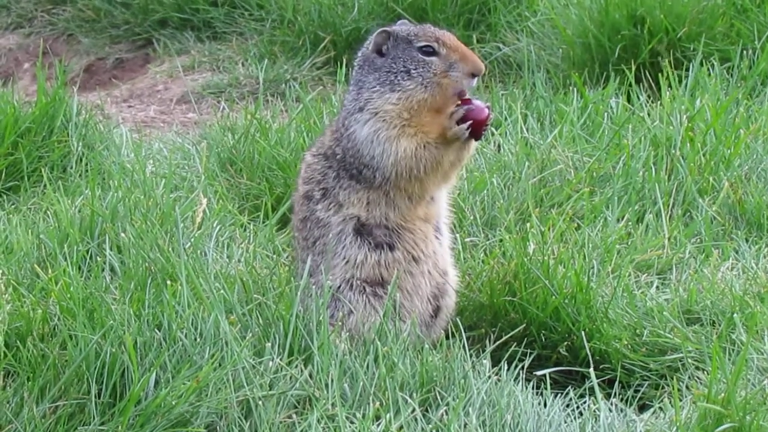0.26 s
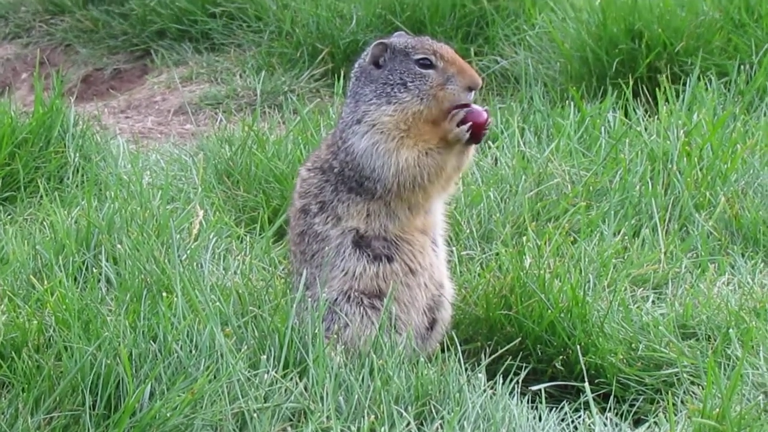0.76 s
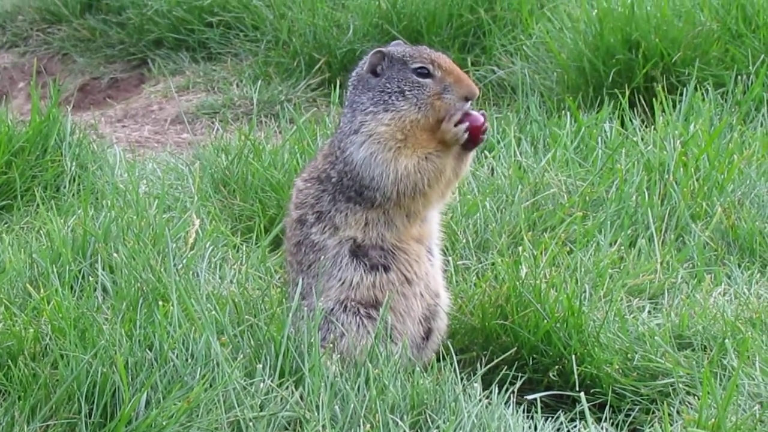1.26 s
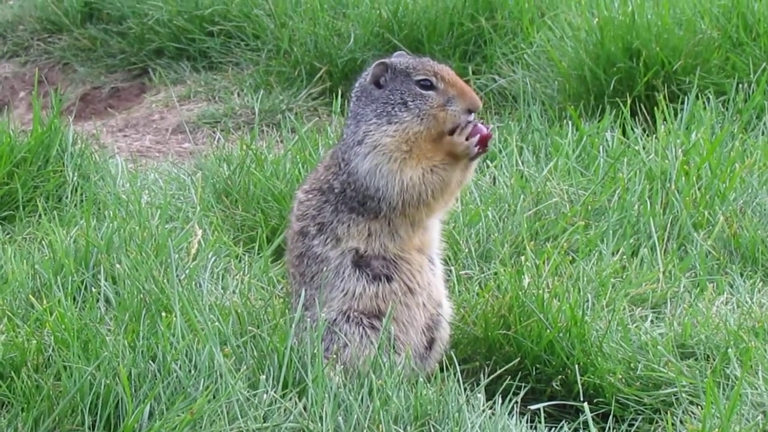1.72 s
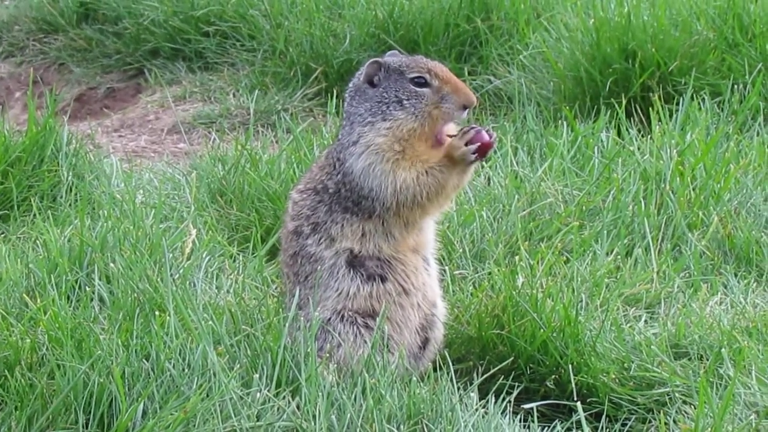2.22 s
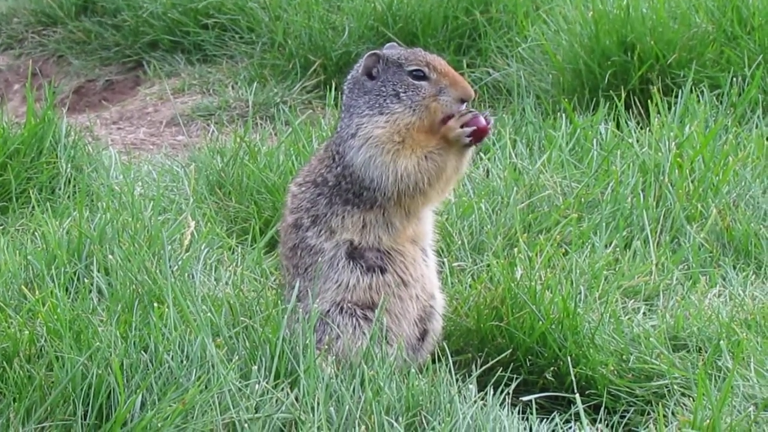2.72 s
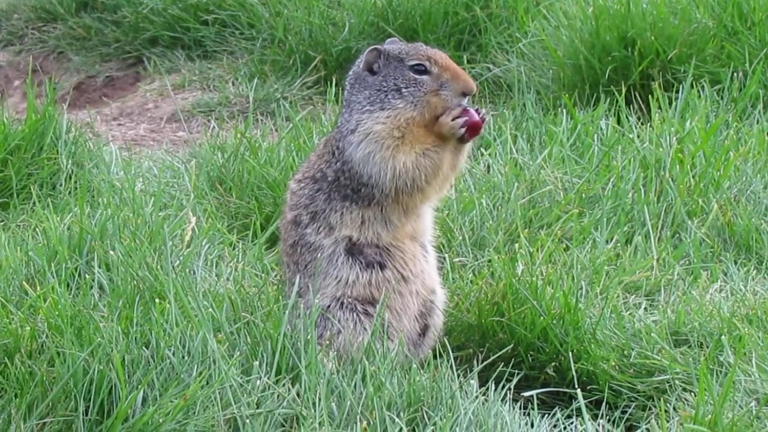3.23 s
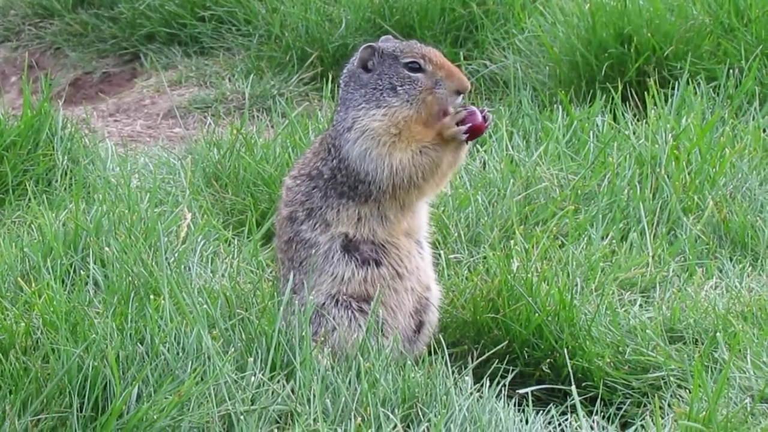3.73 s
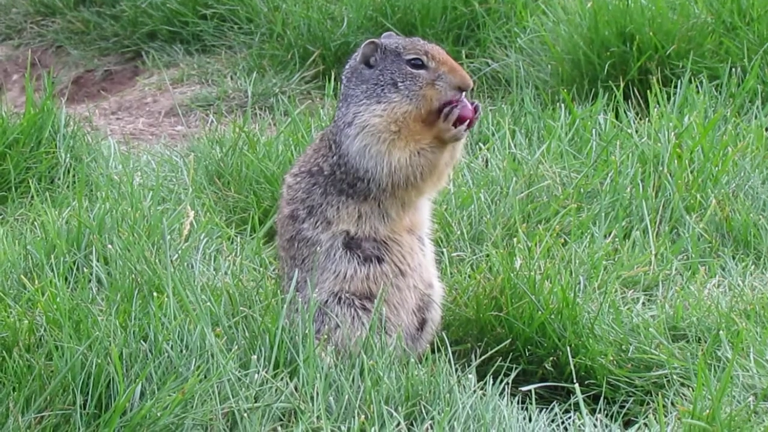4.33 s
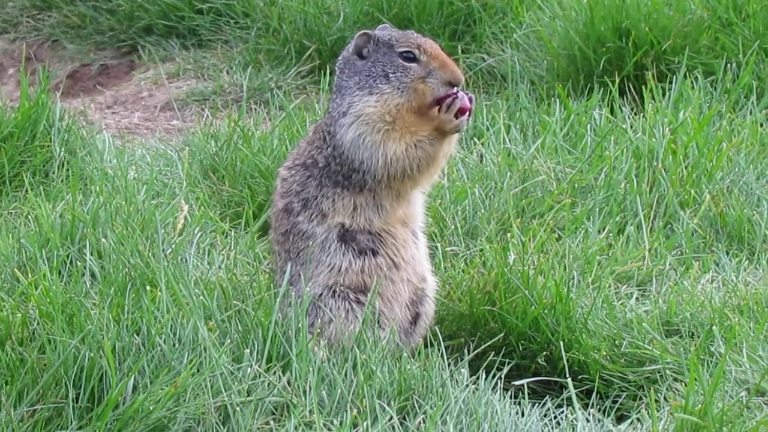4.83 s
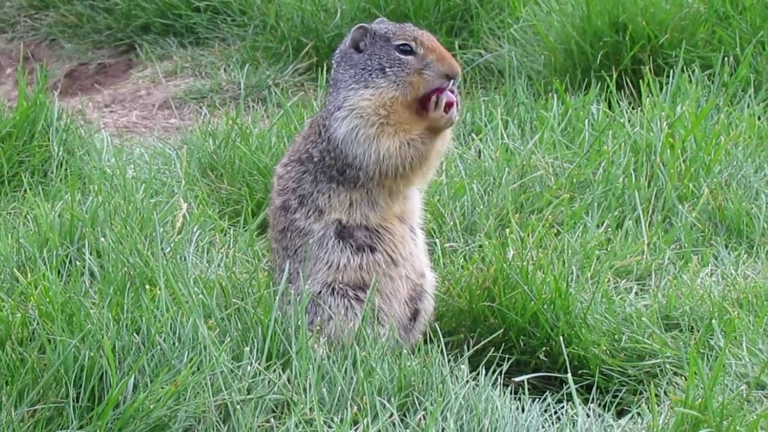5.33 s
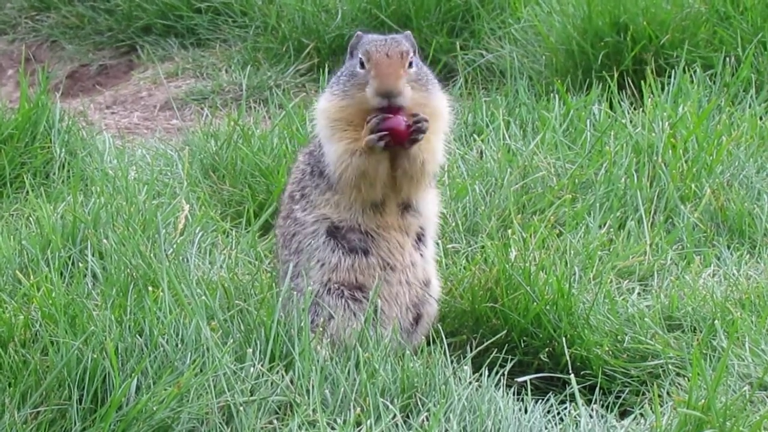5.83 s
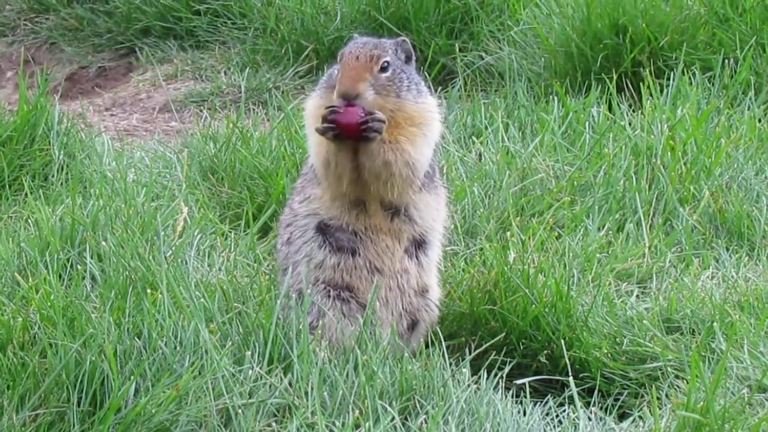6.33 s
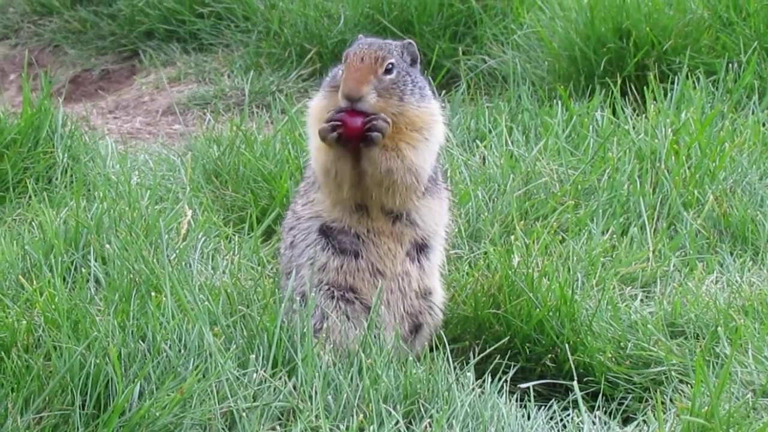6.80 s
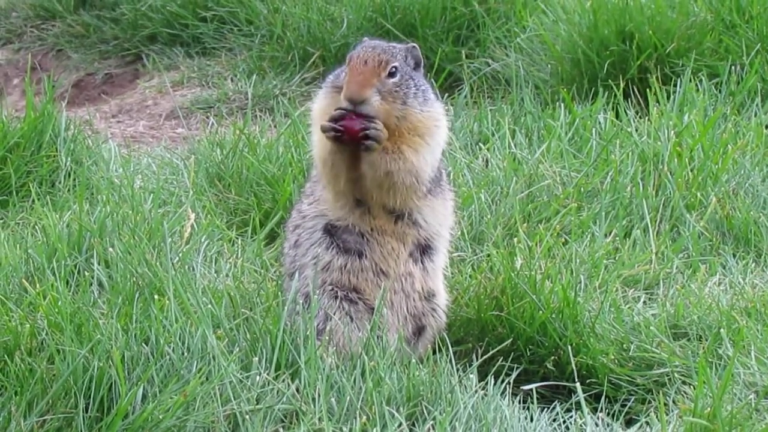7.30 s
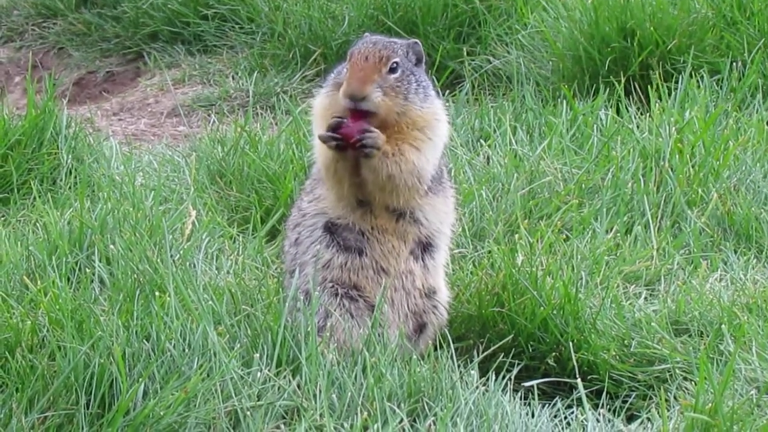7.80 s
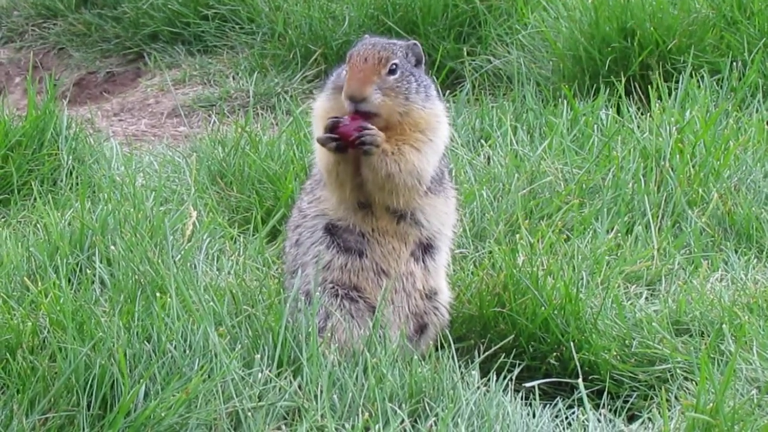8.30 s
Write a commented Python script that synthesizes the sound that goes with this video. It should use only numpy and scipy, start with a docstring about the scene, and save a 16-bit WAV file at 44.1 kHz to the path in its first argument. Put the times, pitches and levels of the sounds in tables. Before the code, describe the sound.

Ground squirrels trade short shrill alarm chirps across an open meadow while one nibbles fruit close by and rising wind buffets and thumps the microphone.

```python
"""Ground squirrels trade shrill alarm chirps across an open meadow: gliding near-pure tones with overtones and rasp.
The edge of the meadow answers each call with a copy and a scattered tail.
One animal nibbles a fruit close by and dry stalks snap, as bursts of filtered noise; a far bird whistles pure tones.
Wind rises and buffets the microphone, mostly its left port: noise that flow makes louder and higher, plus thumps."""
import sys
import numpy as np
from scipy import signal
from scipy.fft import rfft, irfft, next_fast_len
from scipy.io import wavfile
from scipy.ndimage import map_coordinates

SR = 44100
rng = np.random.default_rng(int(sys.argv[2]) if len(sys.argv) > 2 else 0)


def generate_wav(signal):
    """Clip the signal to [-1, 1] and save it as 16-bit WAV at the path in sys.argv[1]."""
    frames = np.transpose(np.atleast_2d(signal))
    scaled = np.clip(frames, -1, 1) * 32767
    pcm = np.round(scaled).astype(np.int16)
    wavfile.write(sys.argv[1], SR, pcm)


N = 377055

# the breeze dies down, then freshens from the left:
# t/s, level at the windward left port/dB, level at the sheltered right port/dB
BREEZE = [(0.0, -42.0, -45.0), (0.681, -35.0, -39.0), (0.82, -44.0, -41.5), (1.43, -46.5, -43.5),
          (1.99, -52.0, -54.5), (2.71, -45.0, -50.0), (3.32, -35.5, -49.0), (4.4, -32.0, -50.0),
          (4.56, -21.0, -46.0), (5.14, -19.5, -34.0), (5.398, -30.0, -41.5), (5.72, -22.0, -38),
          (6.131, -17.5, -35.0), (6.36, -31.5, -34), (6.65, -21.5, -36.5), (7.11, -18.5, -33.5),
          (7.3, -28.0, -40), (8.101, -20.5, -36.5), (8.55, -23.5, -37.0)]


def amp(db):
    """Decibels to gain."""
    return 10 ** (np.asarray(db) / 20)


def unit(x):
    """Scale to rms 1."""
    return x / np.sqrt(np.mean(x ** 2) + 1e-20)


def along(points, hz):
    """Read (f/Hz, value) points at any frequency, on a log axis."""
    f, v = np.transpose(points)
    return np.interp(np.log(hz + 1), np.log(f + 1), v)


def curve(rows, size=N):
    """Join (t/s, value) rows into one value per sample."""
    return np.interp(np.arange(size) / SR, *np.transpose(rows))


def wobble(rate, size=N):
    """A smooth random curve, rate knots a second."""
    knots = rng.standard_normal(4096)
    return map_coordinates(knots, [np.arange(size) * rate / SR], mode="wrap")


def filtered(x, response):
    """Shape the spectrum of x by a response of frequency."""
    n = x.shape[-1]
    m = next_fast_len(n + 8192)
    spectrum = rfft(x, m) * response(np.fft.rfftfreq(m, 1 / SR))
    return irfft(spectrum, m)[..., :n]


def noise(spectrum, size):
    """Coloured noise of rms 1."""
    white = rng.standard_normal(size)
    return unit(filtered(white, lambda hz: amp(along(spectrum, hz))))


def ports(pan_db):
    """Left and right gains: the farther port is shaded; positive pans left."""
    return amp(np.minimum([[pan_db], [-pan_db]], 0))


def add(track, s, sound):
    """Mix a sound into a track at time s."""
    start = max(round(s * SR), 0)
    part = track[..., start:start + sound.shape[-1]]
    part += sound[..., :part.shape[-1]]


def scattered(rate):
    """Irregular moments, rate a second: rows of (t/s, a normal deviate for the strength)."""
    place, strength = rng.standard_normal((2, 256))
    times = (np.arange(len(place)) + place % 1) / rate
    return np.column_stack([times, strength])[times < N / SR]


def meadow(sway_db=1.03):
    """The soft hush of open air: a mid and a side noise, mixed wider towards the treble."""
    # colour of the distant air: f/Hz, level per Hz/dB
    air = [(20, -13.5), (40, 4), (130, 4), (250, 0), (470, -7), (750, -6), (980, -4.5), (1460, -9),
           (3200, -15.5), (4300, -19), (5050, -17.5), (6000, -22), (10200, -25), (16000, -34)]
    # likeness of the two ports: f/Hz, left-right correlation
    likeness = [(60, 0.68), (300, 0.53), (1400, 0.39), (3000, 0.039), (15000, 0.095)]
    # the recorder turns the background down briefly after loud thumps, at these set times: t/s, level/dB
    background = [(0, -49.5), (4.4, -50.5), (5.9, -51), (6.09, -54.5), (6.35, -53), (6.5, -53), (7.2, -52),
                  (7.78, -49), (7.87, -54.5), (8.2, -52), (8.55, -53)]

    def mid_side_gains(hz):
        turn = np.arccos(np.clip(along(likeness, hz), -1, 1)) / 2
        return np.array([np.cos(turn), np.sin(turn)])

    pair = np.array([noise(air, size=N), noise(air, size=N)])
    mid, side = filtered(pair, mid_side_gains)
    level = amp(curve(background) + sway_db * wobble(3.016))
    return level * unit(np.array([mid + side, mid - side]))


def flow():
    """Level of the air flow at the left and right port, in dB: puffs swell and die on the breeze, adding in power."""
    # separate puffs that strike the microphone: peak t/s, length/s, peak level/dB
    puffs = [(0.025, 0.039, -29.5), (0.197, 0.046, -27.5), (0.456, 0.048, -26.5), (2.509, 0.05, -34.5),
             (2.836, 0.038, -24.0), (2.927, 0.072, -19.0), (3.352, 0.055, -25.0), (3.433, 0.051, -29.0),
             (3.719, 0.1, -23.0), (4.187, 0.17, -21.5), (4.491, 0.097, -17.5), (4.844, 0.085, -13.5),
             (5.082, 0.099, -14), (5.54, 0.089, -11.5), (5.929, 0.086, -13), (6.086, 0.099, -11.5),
             (6.495, 0.03, -11), (6.673, 0.046, -16.5), (6.976, 0.084, -16.5), (7.4, 0.058, -16.5),
             (7.691, 0.022, -13.5), (7.849, 0.021, -7.0), (8.078, 0.083, -15), (8.258, 0.093, -17),
             (8.466, 0.032, -13)]
    rise_over_fall = .8  # ratio of the times
    lee_db = -22  # a puff at the sheltered port
    t = np.arange(N) / SR
    power = np.zeros(N)
    for s, length, db in puffs:
        u = (t - s) / (length / 2)
        near = np.abs(u) < 4
        side = np.where(u[near] < 0, rise_over_fall, 1)
        power[near] += amp(db) ** 2 * np.exp(-(u[near] / side) ** 2)
    times, left_db, right_db = np.transpose(BREEZE)
    return [10 * np.log10(amp(np.interp(t, times, breeze_db)) ** 2 + share ** 2 * power)
            for breeze_db, share in ((left_db, 1), (right_db, amp(lee_db)))]


def buffet(level_db, lump_db, trim_db, swell_db, reference_db=-18, calm=.45):
    """Eddies pass a port: faster flow makes them both louder and higher."""
    # turbulence at the reference flow: f/Hz, level per Hz/dB
    turbulence = [(15, -7), (60, 3.5), (130, 3), (210, -2.5), (300, -8), (450, -22.5), (700, -34),
                  (1000, -39.5), (1500, -52.5), (3000, -61), (6000, -120)]
    flow_db = level_db + lump_db * wobble(100)
    speed = np.clip(calm + (1 - calm) * amp(flow_db - reference_db) ** .62, 0, 1.5)
    eddies = noise(turbulence, size=2 * N)
    # reading the noise faster raises its pitch
    passing = map_coordinates(eddies, [np.cumsum(speed)], order=1)
    return amp(flow_db + swell_db * wobble(22) + trim_db) * passing


def thump(width_ms, wake_db=-11):
    """A vortex, a core of low pressure between two shoulders, with a few weaker, broader companions."""
    ms = np.arange(-SR // 25, SR // 25) * 1000 / SR
    vortex = lambda u: (1.5 * u ** 2 - 1) / (1 + u ** 2 / 2) ** 3
    wake = np.zeros(len(ms))
    for lag, spread, size in rng.standard_normal((4, 3)):
        wake += size * vortex((ms - 7 * lag) / (width_ms * amp(2 * abs(spread))))
    return vortex(ms / width_ms) + amp(wake_db) * wake


def wind(low_cut_hz=42):
    """Buffeting at both ports, with single vortices thumping the windward one."""
    # the hardest eddies thump the left port: t/s, core level/dB, half width/ms
    thumps = [(4.827, -10, 0.88), (5.042, -5.5, 0.78), (5.525, -9, 0.53), (5.603, -14.5, 0.58),
              (5.765, -5.5, 1.3), (5.92, -7.5, 0.86), (6.012, -13, .7), (6.084, -1, .8), (6.121, -.5, 0.62),
              (6.151, -7, 0.46), (6.226, -7, 0.52), (6.486, 0.5, 2.18), (6.683, 0.5, 0.95),
              (6.814, -9, 0.76), (6.954, -10.5, 0.53), (7.265, -9, 0.93), (7.695, -5.5, 1.14),
              (7.772, -7, 1.21), (8.169, -13.5, 0.59), (8.451, -10, .9)]
    # lesser eddies come at random, as strong as the breeze that carries them
    eddies_per_s, over_flow_db, scatter_db, eddy_width_ms = 11, 9, 0.5, 0.97
    onset_db, top_db = -27, -10  # the breeze at which they begin to shed; their highest level
    left_db, right_db = flow()
    left = buffet(left_db, lump_db=3.0, trim_db=-0.28, swell_db=1.64)
    right = buffet(right_db, lump_db=2.0, trim_db=2, swell_db=1.4)
    times, breeze_db, _ = np.transpose(BREEZE)
    shed = []
    for s, chance in scattered(eddies_per_s):
        carrier_db = np.interp(s, times, breeze_db)
        if carrier_db > onset_db:
            eddy_db = min(carrier_db + over_flow_db + scatter_db * chance, top_db)
            shed.append((s, eddy_db, eddy_width_ms))
    for s, db, width_ms in thumps + shed:
        push = thump(width_ms)
        add(left, s - len(push) / 2 / SR, amp(db) * push)
    # the capsules lose the deepest pressure swings
    return filtered(np.array([left, right]), lambda hz: 1j * hz / (low_cut_hz + 1j * hz))


def bird():
    """Faint, slightly falling whistles: one unsteady sine each, swelling and fading."""
    # whistles: t/s, length/s, f/Hz, level/dB
    whistles = [(2.064, 0.1, 3280, -67), (2.475, 0.083, 3140, -63.5), (5.348, 0.1322, 3350, -70)]
    out = np.zeros((2, N))
    for s, length, hz, db in whistles:
        u = np.linspace(0, 1, round(length * SR))
        pitch = hz * (1 - 0.01 * (u - .5) + 0.0047 * wobble(153, size=len(u)))
        swell = np.sqrt(2 * np.abs(np.sin(np.pi * u)))
        tone = np.sin(2 * np.pi * np.cumsum(pitch) / SR)
        add(out, s, amp(db) * ports(3.2) * swell * tone)
    return out


def crack(spectrum, t60, grain_db=4):
    """A brittle burst of peak 1: fibres give way one after another, partly alike at both ports."""
    t = np.arange(SR // 6) / SR
    shared, left, right = (noise(spectrum, size=len(t)) for _ in range(3))
    onset = 1 - np.exp(-t / 0.00024)
    fibres = amp(grain_db * wobble(600, size=len(t)) - 60 * t / t60) * onset
    burst = (shared + 0.2 * np.array([left, right])) * fibres
    return burst / np.abs(burst).max()


def stalks():
    """Dry stalks snap: cracks of noise, each with its own brightness and decay."""
    # snaps: t/s, peak level/dB, brightness/dB per octave, t60/s, left-right/dB
    snaps = [(0.4418, -30.5, 4, 0.039, -3), (4.097, -30.5, 10.5, 0.006, 1),
             (7.3757, -20.5, -3.5, 0.0093, -1.5), (7.393, -35, -3, 0.054, 3), (7.405, -35, -6.5, 0.08, -10),
             (7.465, -33, -5, 0.15, 14), (8.0862, -35, 17, 0.018, 0.5)]
    # colour of a snap before its brightness tilt: f/Hz, level per Hz/dB
    stalk = [(500, -31), (1400, -10), (3000, 8), (4500, 3), (7000, -1.5), (10000, -7.5), (16000, -52)]
    out = np.zeros((2, N))
    for s, db, bright_db, t60, pan_db in snaps:
        colour = [(hz, level + bright_db * np.log2(hz / 4000)) for hz, level in stalk]
        add(out, s, amp(db) * ports(pan_db) * crack(colour, t60))
    return out


def bite():
    """The skin breaks with a sharp click, then the flesh crunches: a short crack over a longer, weaker one."""
    # colour of a bite: f/Hz, level per Hz/dB
    colour = [(1180, -34), (2000, -9), (2980, 0.5), (4410, -33), (4940, -9.5), (9250, -2), (12900, -7),
              (16000, -22)]
    click_t60_s, crunch_t60_s, crunch_db = .007, .03, -23
    return crack(colour, click_t60_s) + amp(crunch_db) * crack(colour, crunch_t60_s)


def rustle():
    """A soft, high, grainy noise that swells and fades evenly around its middle."""
    # colour of the rustle: f/Hz, level per Hz/dB
    colour = [(4000, -24), (7000, -12.5), (8800, 1), (11000, -4.5), (13000, 0), (16000, -19)]
    half_length_s = 0.014
    t = np.arange(-SR // 12, SR // 12) / SR
    grain = amp(4.4 * wobble(400, size=len(t)))
    return noise(colour, size=len(t)) * grain * np.exp(-(t / half_length_s) ** 2)


def nibbling(bite_db=4, rustle_db=-4):
    """Bites click in the fruit; a soft, high noise swells and fades around each, and faintly at random between."""
    # the crispest bites: t/s, click level before bite_db/dB, rustle level before rustle_db/dB
    bites = [(0.7013, -47, -75), (1.582, -32.5, -55), (3.298, -46.5, -62.5), (3.3203, -43, -54),
             (3.4885, -40.5, -63.5), (3.8076, -43, -65), (4.3127, -44, -73), (4.561, -43.5, -56.5),
             (5.5415, -43, -53), (5.7, -51, -57), (5.89, -38, -66), (7.1188, -51, -63), (7.164, -42.5, -63),
             (7.279, -36, -55), (7.497, -48, -55), (7.535, -38.5, -55)]
    faint_per_s, faint_db, faint_scatter_db = 5.9, -65, 3  # random rustles, level before rustle_db
    out = np.zeros((2, N))
    for s, db, _ in bites:
        add(out, s, amp(db + bite_db) * bite())
    rustles = [(s, db) for s, _, db in bites]
    rustles += [(s, faint_db + faint_scatter_db * chance) for s, chance in scattered(faint_per_s)]
    for s, db in rustles:
        soft = rustle()
        add(out, s - len(soft) / 2 / SR, amp(db + rustle_db) * soft)
    return out


def echo(sound, delay, mirror_db=-9, grass_db=-13, trunk_db=-16, trunk_spread_s=0.09, count=4):
    """Grass scatters a little at once; the meadow's edge then returns a copy, a few later ones and a long scatter."""
    # scattered returns after the first echo: t/s, relative level/dB
    scatter = [(0, -5.5), (.015, -3), (.04, -11), (.11, -21), (.22, -27.5), (.42, -31), (.8, -67.5)]
    edge = round(delay * SR)
    shape = amp(np.concatenate([np.full(edge, grass_db), curve(scatter, size=SR)]))
    tail = rng.standard_normal((2, len(shape))) * shape / np.linalg.norm(shape)
    tail[:, edge] += amp(mirror_db)
    for far in rng.random(count):
        tail[:, edge + round(far * trunk_spread_s * SR)] += amp(trunk_db - 12 * far)
    return signal.fftconvolve(sound[None], tail, axes=1)


def chirp(length, hz, overtone_db, lead_ms, fade, rise_db, scoop,
          jitter=0.002, third_db=-40, rasp_db=-37, attack=.0018):
    """A nearly pure squeak with overtones and breathy rasp, shifted in phase between the two ports."""
    # the pitch arches, then drops: share of the length, share of the pitch
    arch = [(0, .972), (.12, .989), (.33, .997), (.56, 1.002), (.68, .999), (.76, .987), (.82, .955),
            (.9, .865), (1, .78)]
    # the call swells, then fades as it drops: share of the length, level before the fade depth/dB
    swell = [(0, -7.5), (.12, -3.5), (.33, -1.4), (.58, -2), (.72, -5), (.82, -5.5), (.9, -22.5),
             (1, -22.5)]
    t = np.arange(SR // 6) / SR
    u = np.minimum(t / length, 1)
    bend = 1 - scoop * np.exp(-u / 0.13) + jitter * wobble(710, size=len(t))
    pitch = hz * np.interp(u, *np.transpose(arch)) * bend
    gate = np.clip(t / attack, 0, 1) * np.clip((length - t) / 0.0055, 0, 1)
    swell_db = fade * np.interp(u, *np.transpose(swell))
    effort = amp(swell_db + rise_db * (u - .5) + .15 * wobble(230, size=len(t)))
    lead = np.array([[.5], [-.5]]) * lead_ms / 1000
    phase = 2 * np.pi * (np.cumsum(pitch) / SR + pitch * lead)
    overtones = amp(overtone_db) * np.sin(2 * phase) + amp(third_db) * np.sin(3 * phase)
    rasp = amp(rasp_db) * noise([(2000, -34.0), (4500, -7), (9000, -7), (15000, -25.5)], size=len(t))
    # the overtones grow faster with effort than the fundamental, the rasp slower
    voice = effort * np.sqrt(2) * (np.sin(phase) + effort ** 0.12 * overtones)
    return gate * (voice + np.sqrt(effort) * rasp)


def squirrels(edge_pan_db=9):
    """Five animals call from their own places; their dulled echoes come from the left."""
    # callers: octave overtone/dB, left-right/dB, depth of the fade (factor), crescendo/dB
    callers = { "near": (-6, 10.5, 1.0, -1), "shrill": (-8, 9.5, 0.3, 10), "right": (-20.5, -6, 0.72, 9.5),
               "high": (-29, 11, 1.5, 6.5), "far": (-4.5, -20, 0.3, 6), }
    # the callers' paths to the microphone: left lead/ms, echo delay/s
    paths = {"near": (.074, .094), "shrill": (.066, .065), "right": (-.04, .085), "high": (.048, .055),
             "far": (.052, .035)}
    # how far below the arch each caller starts: share of the pitch (negative = above)
    scoops = {"near": 0, "shrill": 0, "right": 0, "high": .03, "far": -.02}
    # alarm chirps: t/s, caller, length/s, f/Hz, level/dB, echo level/dB
    chirps = [ (0.157, "right", 0.085, 5010, -51, -47), (0.338, "near", 0.074, 4500, -9.5, -39),
              (0.442, "high", 0.068, 5530, -33.5, -59), (0.718, "far", 0.13, 5098, -62, -60),
              (1.109, "shrill", 0.052, 4818, -36, -49.5), (1.372, "right", 0.074, 5040, -37.5, -46.5),
              (1.716, "far", 0.15, 5110, -60.5, -60), (2.208, "high", 0.074, 5470, -34.5, -62),
              (2.22, "near", 0.077, 4476, -11, -39), (2.361, "right", 0.079, 5020, -35, -49),
              (2.802, "far", 0.12, 5110, -60, -59.5), (3.065, "shrill", 0.053, 4865, -34.5, -49),
              (3.276, "right", 0.071, 5032, -35, -45.5), (3.895, "far", 0.14, 5060, -61.5, -60),
              (4.092, "high", 0.069, 5490, -31.5, -57), (4.387, "near", 0.065, 4435, -14.5, -41.5),
              (4.778, "right", 0.08, 5076, -36, -42.5), (5.018, "shrill", 0.06, 4826, -30, -52),
              (5.187, "far", .12, 5100, -63, -61), (5.702, "right", 0.078, 5030, -39.5, -50.5),
              (6.204, "far", 0.15, 5084, -64, -59.5), (6.619, "right", 0.075, 4990, -34.5, -51),
              (6.826, "near", 0.073, 4504, -17.5, -40), (6.956, "shrill", .064, 4850, -36.5, -51.5),
              (7.303, "far", 0.15, 5082, -64, -53.5), (7.746, "high", 0.057, 5490, -44, -66),
              (7.846, "right", 0.076, 5000, -48.5, -51), ]
    out = np.zeros((2, N))
    for s, caller, length, hz, db, echo_db in chirps:
        overtone_db, pan_db, fade, rise_db = callers[caller]
        lead_ms, delay = paths[caller]
        call = chirp(length, hz, overtone_db, lead_ms, fade, rise_db, scoops[caller])
        add(out, s, amp(db) * call * ports(pan_db))
        dulled = filtered(call[0], lambda f: amp(along([(5000, -0.5), (10000, -4.0)], f)))
        add(out, s, amp(echo_db) * echo(dulled, delay) * ports(edge_pan_db))
    return out


def scene():
    """Everything that reaches the microphone."""
    return meadow() + wind() + bird() + stalks() + nibbling() + squirrels()


def record(dry, top_hz=16100):
    """The loudest peaks round off towards full scale; the band ends at top_hz."""
    held = dry / (1 + dry ** 6) ** (1 / 6)
    return filtered(held, lambda hz: hz < top_hz)


dry = scene()
out = record(dry)
generate_wav(out)
```